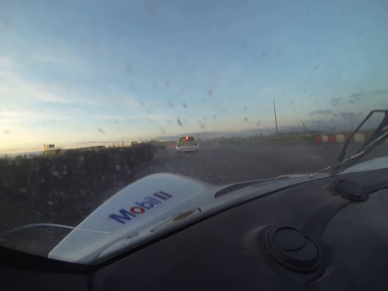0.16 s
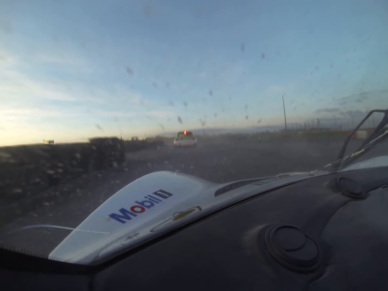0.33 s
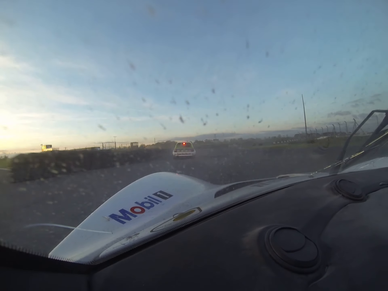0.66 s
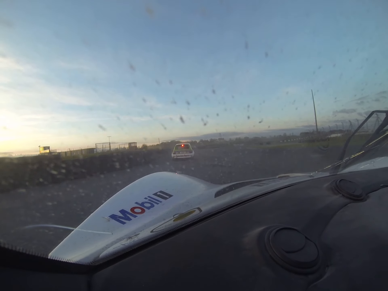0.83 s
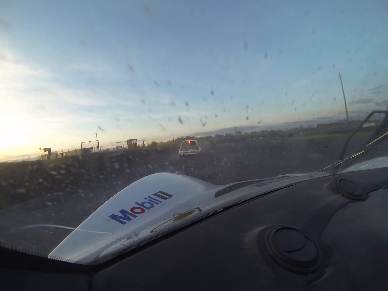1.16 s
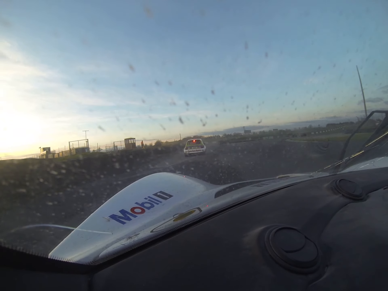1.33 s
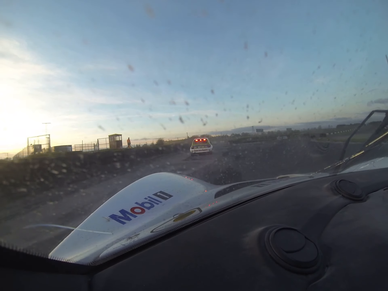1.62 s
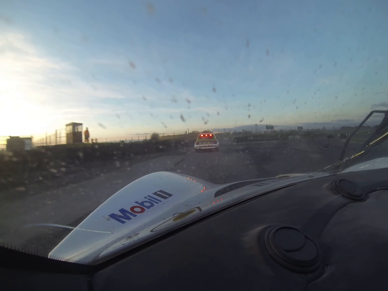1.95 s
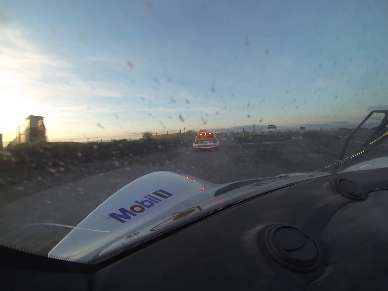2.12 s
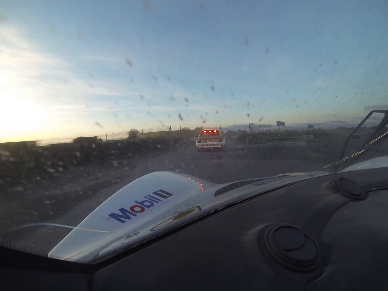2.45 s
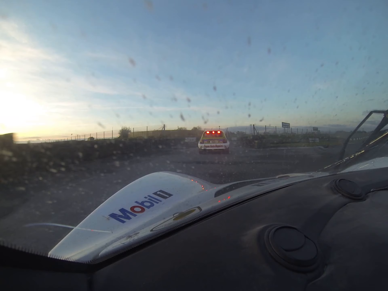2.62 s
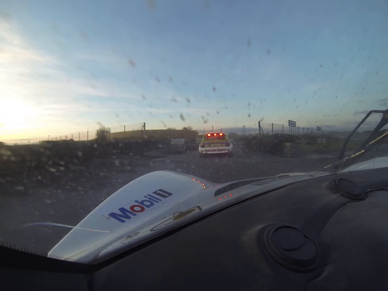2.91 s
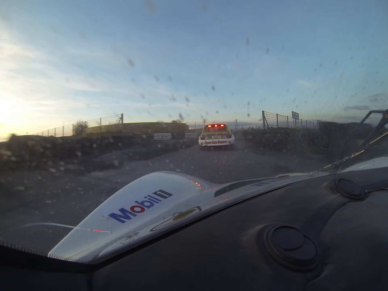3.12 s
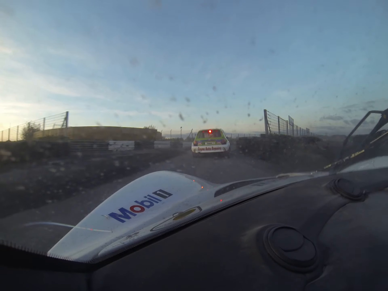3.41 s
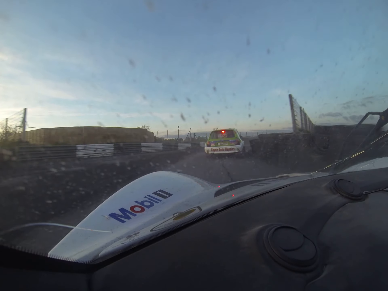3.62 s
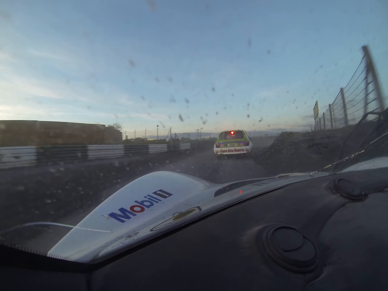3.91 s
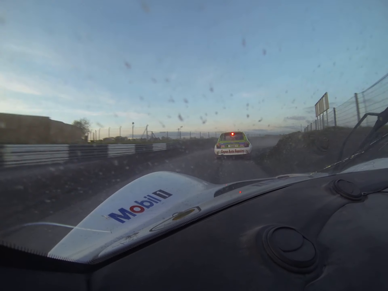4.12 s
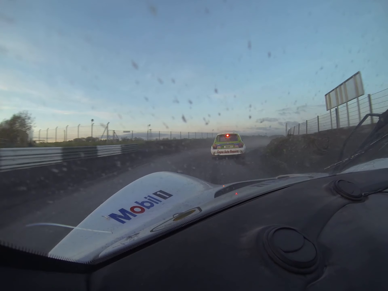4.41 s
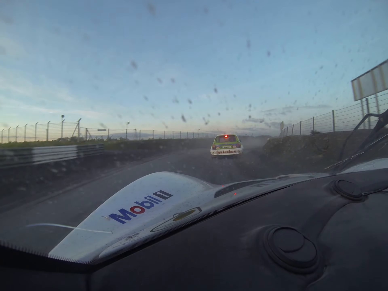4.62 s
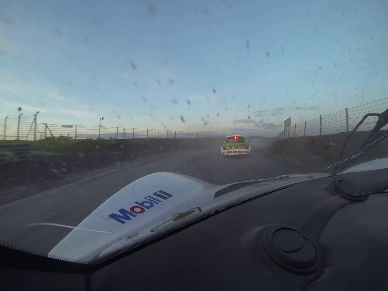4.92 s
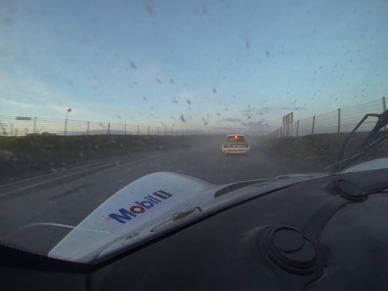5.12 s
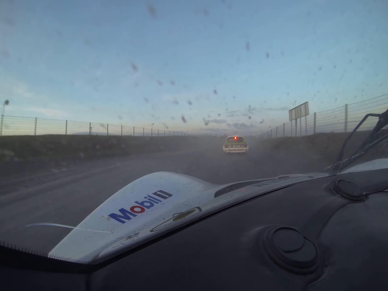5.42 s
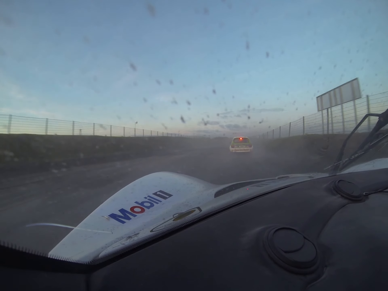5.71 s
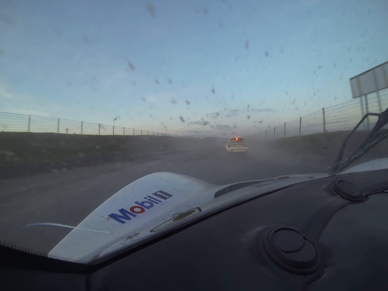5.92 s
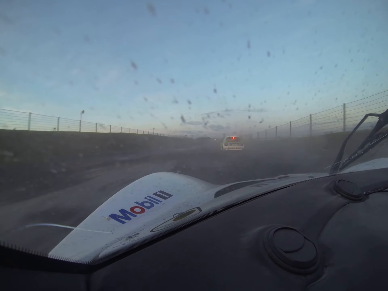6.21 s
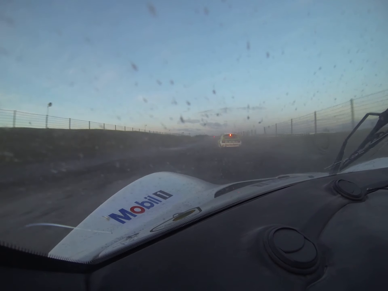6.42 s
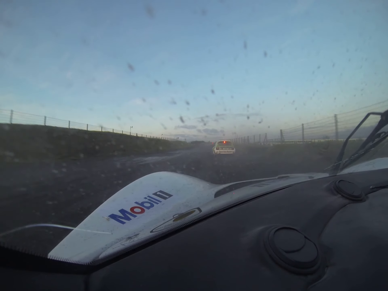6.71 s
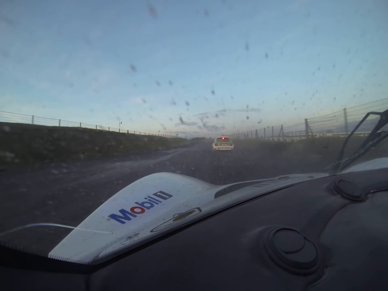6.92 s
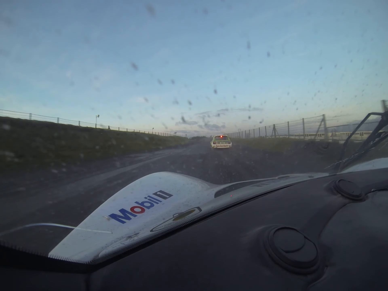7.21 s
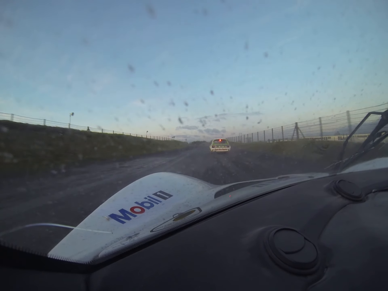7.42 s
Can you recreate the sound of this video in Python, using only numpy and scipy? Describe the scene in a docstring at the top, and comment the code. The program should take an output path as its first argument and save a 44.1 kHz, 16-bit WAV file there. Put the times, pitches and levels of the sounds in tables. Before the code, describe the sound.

A racing car's growling engine slows for a bend then pulls up, heard from the cabin with bangs, gravel spray and gear whine.

```python
"""Inside a rally car racing on a wet, muddy track. The bare body shell booms and shakes on the ruts,
the wheels fling grit against the arches and stones ring a metal guard. Sharp knocks and bangs, mostly
off the throttle, rattle the panels and thud through the floor. Over this the four-cylinder engine
sinks for a bend and pulls up again. Its firing makes the cabin drone, its exhaust growl and
mechanical rasp swell under load, and its gear teeth whine."""
import sys
import numpy as np
from scipy import signal
from scipy.fft import rfft, irfft
from scipy.io import wavfile
from scipy.ndimage import uniform_filter1d, minimum_filter1d

SR = 44100
rng = np.random.default_rng(int(sys.argv[2]) if len(sys.argv) > 2 else 0)


def int16_out(signal):
    """Quantize to a 16-bit WAV file."""
    q = np.round(np.clip(np.atleast_2d(signal).T, -1, 1) * 32767)
    wavfile.write(sys.argv[1], SR, q.astype(np.int16))


N = 333396
TIME = np.arange(N) / SR


def from_db(db):
    """Turn decibels into a number to multiply by."""
    return 10 ** (np.asarray(db) / 20)


def unit_power(x):
    """Scale a signal to an average power of 1."""
    return x / np.sqrt(np.mean(x ** 2) + 1e-20)


def steadied(x, seconds):
    """Hold the power near 1 over every stretch of this length."""
    return x / np.sqrt(uniform_filter1d(x ** 2, int(seconds * SR)) + 1e-9)


def in_time(rows):
    """Join (seconds, value) points with straight lines, giving a value for every sample."""
    seconds, values = np.transpose(rows)
    return np.interp(TIME, seconds, values)


def at_hz(rows, hz):
    """Read a curve of (Hz, dB) points at these frequencies."""
    points_hz, db = np.transpose(rows)
    return np.interp(np.log(hz), np.log(points_hz), db)


def drift(rate_hz):
    """Smooth random wandering, typically 1 in size; a higher rate wanders faster."""
    step = 40  # samples between points
    pole = np.exp(-2 * np.pi * rate_hz * step / SR)
    noise = rng.standard_normal(N // step + 2002)
    slow = signal.lfilter([1], [1, -2 * pole, pole * pole], noise)[2000:]
    return np.interp(np.arange(N) / step, np.arange(len(slow)), unit_power(slow))


def swell(middle_s, length_s):
    """A rounded rise and fall of height 1."""
    return np.maximum(1 - (2 * (TIME - middle_s) / length_s) ** 2, 0)


def burst(start_s, attack_s, decay_s):
    """A quick rise to height 1 that then dies away."""
    age = TIME[:SR // 4]
    shape = (1 - np.exp(-age / attack_s)) * np.exp(-age / decay_s)
    out, at = np.zeros(N + SR), int(start_s * SR)
    out[at:at + len(age)] = shape / shape.max()
    return out[:N]


def grains(per_s, spread_db):
    """Tiny impacts at random moments; more spread makes their sizes more uneven."""
    sizes = from_db(spread_db * np.minimum(rng.exponential(1, N), 4)) * rng.choice([-1, 1], N)
    return unit_power(sizes * (rng.random(N) < per_s / SR))


# Where the cabin's panels ring. Each row: pitch in Hz, width in Hz, boost in dB (minus is a dip).
PANELS = [(509, 8.3, 6), (657, 270, -6.5), (840, 6.1, 2), (1022, 139, 15.5), (1332, 78, 9.5),
          (1512, 110, 8.5), (1686, 76, 8.5), (1920, 150, 6), (2052, 74, 12.5), (2100, 86, -10),
          (2297, 66, 10), (2881, 180, 14.5), (3210, 51, 7.5), (3630, 44, 7), (4266, 130, 10.5),
          (4670, 100, 6.5), (5030, 55, 6.5), (5830, 80, 1.5), (6300, 79, 6.5), (7220, 110, 6.5),
          (7650, 83, 4.5)]

def panels_db(hz):
    """How much the ringing panels boost these frequencies."""
    return sum(db / (1 + (2 * (hz - centre) / width) ** 2) for centre, width, db in PANELS)


def coloured(x, colour, ringing=0):
    """Give a sound its tone colour, plus a share of the panels' ringing."""
    size = 32768
    hz = np.maximum(np.arange(size // 2 + 1) * SR / size, 1)
    gain = from_db(at_hz(colour, hz) + ringing * panels_db(hz))
    # Build the filter so that it rings after each hit, never before.
    cepstrum = irfft(np.log(unit_power(gain)))
    cepstrum[1:size // 2] *= 2
    cepstrum[size // 2 + 1:] = 0
    return signal.fftconvolve(x, irfft(np.exp(rfft(cepstrum))))[:N]


# Tone colours of the boom and the deeper shake. Each row: frequency in Hz, level in dB.
BOOM_COLOUR = [(25, -26.5), (55, -7.5), (85, -5.5), (125, -9), (180, 6), (230, 2), (290, -2), (340, -27.5),
               (450, -17.5), (700, -34), (2000, -76)]
SHAKE_COLOUR = [(12, -30), (21, 1.5), (28, 8), (38, -5), (55, -21.5), (100, -33.5), (300, -92.5)]
# How rough the track is. Each row: time in seconds, dB above the usual.
ROUGHNESS = [(0, 3.5), (0.45, 2.5), (0.7, -5.5), (1.0, -2), (2.3, 0), (3.38, 0), (3.68, -8), (3.88, -1.5),
             (4.33, 1), (4.43, -9), (4.9, 0), (5.75, 1), (6.12, -5.5), (6.48, -0.5), (6.72, -3), (7.56, 3)]
# Ruts and ripples. Each row: middle and length in seconds, then extra boom, shake and hum in dB.
RUTS = [(0.247, 1.14, -4, 6.5, 12.5), (1.168, 0.21, 2.5, 4.5, 0), (1.97, 0.55, 3, 5.5, -2),
        (2.413, 0.74, -1, 1, 17), (2.85, 0.15, 5, 8.5, 7), (3.085, 0.37, 1, 10.5, 8),
        (3.404, 0.28, 1, 0.5, 19), (4.09, 0.38, -0.5, 11, 11), (5.212, 0.2, 6, 8, -2),
        (5.407, 0.34, 1, 10, 1), (5.733, 0.27, 0, 6, -7), (6.52, 0.24, 4, 3, 10),
        (7.485, 0.14, -6.5, 10.5, 3.5)]

def body_shell(hum_hz=85):
    """The rough track makes the cabin's air boom and hum, and rocks the body harder in every rut."""
    rough_db = in_time(ROUGHNESS)
    boom_db, shake_db, hum_db = -21 + rough_db, -24 + 0.3 * rough_db, -39.5 + rough_db
    shake_db -= 9 * swell(middle_s=5.03, length_s=0.49)  # the body settles for a moment
    for middle, length, more_boom, more_shake, more_hum in RUTS:
        rut = swell(middle, length)
        boom_db += more_boom * rut
        shake_db += more_shake * rut
        hum_db += more_hum * rut
    boom = steadied(coloured(rng.standard_normal(N), BOOM_COLOUR), seconds=0.11)
    shake = steadied(coloured(rng.standard_normal(N), SHAKE_COLOUR), seconds=0.15)
    angle = 2 * np.pi * hum_hz * TIME
    hum = steadied(drift(42) * np.sin(angle) + drift(24) * np.cos(angle), seconds=1.0)
    return from_db(boom_db) * boom + from_db(shake_db) * shake + from_db(hum_db) * hum


# Wet patches. Each row: middle in seconds, length in seconds, extra gravel in dB.
WET_PATCHES = [(5.15, 0.61, 5), (7.5, 0.54, 2.5)]
# The biggest sprays of grit. Each row: start in seconds, level in dB, share of sand from 0 to 1.
SPRAYS = [(0.506, -38.5, 0.06), (1.246, -43, 0.2), (1.271, -40.5, 0.3), (1.338, -46, 0.9), (1.368, -50, 1),
          (1.393, -47, 0.9), (2.221, -40.5, 0.44), (2.436, -42.5, 0.5), (2.868, -41, 0.16),
          (3.169, -47, 0.5), (3.266, -43, 0.85), (3.33, -52, 0.2), (3.655, -46.5, 0), (3.742, -50.5, 0),
          (3.873, -50, 0.1), (4.069, -43, 0.24), (4.195, -40, 0.05), (4.275, -26, 0.17), (4.321, -42.5, 1),
          (5.188, -50, 0.9), (5.263, -38.5, 1), (5.361, -44, .9), (5.422, -36.5, 0.6), (5.574, -31, 0.23),
          (5.72, -37, 0.45), (6.21, -40.5, 0.35), (6.607, -45.5, 0), (7.082, -41, 0.73)]
# Tone colour of the grit. Each row: frequency in Hz, level in dB.
GRIT_COLOUR = [(500, -29), (1800, 7), (4200, 5), (5400, -6.5), (8000, -5.5), (11000, -10), (14500, -20)]

def grit(load_db, pull, clods_per_s=5, attack_s=0.0032, decay_s=0.012, spray_boost_db=6, mud_hz=6900):
    """Clods burst on the arches, sand sharp and mud dull, over gravel that grows as the wheels spin."""
    wet_db = sum(db * swell(middle, length) for middle, length, db in WET_PATCHES)
    gravel_level = from_db(-49.5 + 1.15 * load_db + 1.5 * pull + wet_db + 3.4 * drift(23))
    clod_hits = rng.random(N) < clods_per_s / SR
    clods = clod_hits * gravel_level * from_db(2 + rng.standard_normal(N))
    sand_level = signal.fftconvolve(clods, burst(0, attack_s, decay_s)[:SR // 4])[:N]
    mud_level = np.zeros(N)
    for start, db, sand_share in SPRAYS:
        shower = from_db(db + spray_boost_db) * burst(start, attack_s, decay_s)
        sand_level += sand_share * shower
        mud_level += (1 - sand_share) * shower
    patter = gravel_level * grains(per_s=13000, spread_db=0.5)
    mud = mud_level * grains(per_s=3000, spread_db=6.5)
    dull = signal.sosfilt(signal.butter(4, mud_hz, fs=SR, output="sos"), patter + mud)
    ticks = from_db(-17) * gravel_level * grains(per_s=41, spread_db=0.5)  # chips on the windscreen
    sand = sand_level * grains(per_s=3800, spread_db=0)
    return coloured(sand + dull + ticks, GRIT_COLOUR, ringing=0.83)


# Stones that hit a metal guard. Each row: start in seconds, level in dB.
STONES = [(2.828, -47.5), (2.919, -57), (3.659, -60), (3.873, -50), (4.16, -53), (4.279, -59)]
# The guard's ringing tones. Each row: pitch in Hz, level in dB, seconds to fade by 60 dB.
GUARD_TONES = [(3240, 4, 0.23), (3840, -14.5, .14), (4390, 5.5, 0.19), (4900, 2.5, 0.18),
               (5960, -16, 0.057), (7550, -40, 0.059)]

def stones(spread_db=3.1):
    """Each stone rings all the guard's tones, in a slightly different mix every time."""
    out, age = np.zeros(N), TIME[:SR // 3]
    for start, db in STONES:
        at = int(start * SR)
        for hz, tone_db, fade_s in GUARD_TONES:
            strength = from_db(db + tone_db + rng.normal(0, spread_db))
            fade = from_db(-60 * age / fade_s)
            out[at:at + len(age)] += strength * fade * np.sin(2 * np.pi * hz * age)
    return out


# Sharp knocks and bangs, mostly off the throttle.
# Each row: start in seconds, rattle in dB, thud in dB, rattle decay in seconds.
KNOCKS = [(.198, -22, -12.5, 0.0025), (0.262, -24.5, -31, 0.018), (0.421, -17, -11.5, 0.0056),
          (0.499, -12.5, -24, 0.014), (0.544, -26, -21.5, 0.025), (2.002, -19.5, -15, 0.0046),
          (2.409, -24, -30, .003), (2.441, -23, -35, 0.0032), (2.815, -20.5, -30.5, 0.029),
          (2.922, -22, -24, 0.0066), (3.289, -26.5, -9.5, 0.018), (3.31, -19, -13, 0.022),
          (3.354, -16, -12, 0.0046), (3.423, -26, -15.5, 0.027), (3.842, -22.5, -14.5, 0.016),
          (3.959, -25, -13.5, 0.024), (4.114, -19.5, -17, 0.0074), (4.166, -14, -7.5, 0.0025),
          (4.283, -18, -13.5, 0.021), (4.324, -9, -8.5, 0.0031), (4.372, -24, -34, 0.0015),
          (5.268, -15.5, -25, 0.0073), (6.575, -31, -8.5, 0.014), (6.608, -21.5, -26, 0.0077)]
# Tone colour of the rattle. Each row: frequency in Hz, level in dB.
RATTLE_COLOUR = [(100, -17), (520, 2), (750, -3.5), (1100, -2), (1600, 7.5), (2000, 0.5), (2300, -15),
                 (4500, -25.5), (5500, -37), (14000, -69.5)]

def knocks_and_bangs(thud_hz=185, overtone_hz=300, thud_decay_s=0.014, bump_hz=72, bump_decay_s=0.029):
    """Each one rattles the panels for an instant, thuds through the floor and bumps the whole shell."""
    rattle_level, blows = np.zeros(N), np.zeros(N)
    for start, rattle_db, thud_db, decay in KNOCKS:
        rattle_level += from_db(rattle_db) * burst(start, attack_s=0.0044, decay_s=decay)
        blows[int(start * SR)] = from_db(thud_db + 5.5)
    age = TIME[:SR // 5]
    overtone = from_db(-11) * np.sin(2 * np.pi * overtone_hz * age)
    thud = (np.sin(2 * np.pi * thud_hz * age) - overtone) * np.exp(-age / thud_decay_s)
    bump = from_db(-12.5) * np.sin(2 * np.pi * bump_hz * age) * np.exp(-age / bump_decay_s)
    rattle = steadied(coloured(rng.standard_normal(N), RATTLE_COLOUR, ringing=0.39), seconds=0.0077)
    return rattle_level * rattle + signal.fftconvolve(blows, thud + bump)[:N]


# How loud the gears whine. Each row: time in seconds, level in dB.
WHINE = [(0, -42), (1.7, -42), (4.5, -57.5), (5.0, -37), (5.5, -33.5), (5.66, -17), (5.86, -35.5),
         (6.35, -34), (7.56, -65.5)]

def gear_whine(firings, teeth_per_firing=9.4, waver=0.18):
    """Meshing teeth sing a wavering tone in step with the engine."""
    backlash = 0.3 * drift(25)  # slack between the teeth
    tone = np.sin(2 * np.pi * teeth_per_firing * firings + backlash) * (1 + waver * drift(40))
    return from_db(in_time(WHINE)) * unit_power(tone)


# Brief lifts off the throttle. Each row: start and length in seconds, dip of the drone in dB,
# dip of the engine's higher sounds in dB (minus is a boost).
LIFTS = [(0, 0.42, 8.5, 0.5), (0.303, 0.078, 27, 9), (0.369, 0.38, 13, 3.5), (0.708, 0.35, 7.5, 1.5),
         (2.543, 0.085, 8.5, 1.5), (2.695, 0.22, 4, 6), (3.08, 0.16, 13, -2), (6.605, 0.16, 8.5, 7.5),
         (6.815, 0.071, 4, 5)]

def throttle_lifts():
    """Level changes in dB: each lift sets in quickly, holds, and lets go a little more slowly."""
    drone_db, upper_db = 0, 0
    for start, length, drone_dip, upper_dip in LIFTS:
        lifted = np.interp(TIME, start + length * np.array([0, 0.2, 0.7, 1]), [0, 1, 1, 0])
        drone_db -= drone_dip * lifted
        upper_db -= upper_dip * lifted
    return drone_db, upper_db


# Tone colour of the rasp. Each row: frequency in Hz, level in dB.
RASP_COLOUR = [(100, -16), (350, 3), (480, -2.5), (680, -1.5), (920, -2.5), (1200, -7.5), (1600, 2.5),
               (1980, -4), (2150, -13), (3000, -23), (3700, -26.5), (4600, -25.5), (5300, -41),
               (10000, -50)]

def engine_rasp(firings, load_db, lift_db, repeat=0.61, pulsing=0.57):
    """Valves and gears clatter: part repeats every cycle of four firings, part is always new."""
    size = 1024
    cycle_noise = np.interp(firings / 4 % 1 * size, np.arange(size), rng.standard_normal(size))
    pulses = 1 + pulsing * np.cos(2 * np.pi * firings)
    clatter = (repeat * cycle_noise + rng.standard_normal(N)) * pulses * from_db(0.47 * drift(58))
    rasp = steadied(coloured(clatter, RASP_COLOUR, ringing=0.96), seconds=0.95)
    return from_db(-26.5 + load_db + lift_db) * rasp


# The tones of the growl. Each row: vibrations per cycle of four firings, level in dB.
GROWL_TONES = [(5, 4), (6, -18), (7, -21.5), (9, -14.5), (10, -14), (11, -20), (12, -4.5), (16, -6.5),
               (19, -7), (20, -7), (22, -15), (24, -10), (28, -10), (32, -14.5), (36, -19), (40, -19.5)]
# The exhaust pipe's snarl and the hollow below it. Each row: frequency in Hz, boost in dB.
PIPE = [(550, 0.5), (680, -6), (790, -1), (835, 7), (930, 7.5), (990, -3), (1150, 2.5), (1400, -2)]

def exhaust_growl(firing_hz, firings, load_db, pull, lift_db, roughness=0.67):
    """Rough tones follow the engine's speed and swell where the pipe and the panels ring."""
    angle = 2 * np.pi * firings + 0.07 * drift(28)  # slightly uneven firing
    grid_hz = np.arange(SR // 8)
    boost_db = panels_db(grid_hz)
    panel_gain = from_db((boost_db - boost_db.max() / 2) / 2)
    growl = 0
    for per_cycle, db in GROWL_TONES:
        per_firing = per_cycle / 4
        hz = per_firing * firing_hz
        phase = per_firing * angle + 0.28 * drift(35) + rng.uniform(0, 2 * np.pi)
        gain = from_db(db + at_hz(PIPE, hz)) * np.interp(hz, grid_hz, panel_gain)
        growl += gain * (1 + roughness * np.tanh(drift(17))) * np.sin(phase)
    speed_db = 7 * np.log2(firing_hz / 190)  # 7 dB louder at twice the speed
    return np.sqrt(2) * from_db(-37 + load_db + 3.5 * pull + speed_db + lift_db) * growl


# Ragged firing off the throttle. Each row: time in seconds, how far the wave strays in radians.
BURBLE = [(0, .2), (.55, .3), (.7, .07), (2.7, .07), (3.15, .5), (3.35, 1.3), (4.35, 1.3), (4.6, .1),
          (7.56, .07)]
# How the cabin booms at the firing rate and an octave up. Each row: frequency in Hz, level in dB.
DRONE_RESPONSE = [(135, -29.5), (152, -31), (161, -24), (164, -26.5), (169, -17.5), (174, -11), (181, -11),
                  (192, -13), (203, -12.5), (211, -21.5), (221, -21.5), (232, -12.5)]
OCTAVE_RESPONSE = [(270, -30.5), (286, -39), (297, -28.5), (322, -37.5), (340, -26), (362, -33.5),
                   (384, -42), (425, -39.5), (465, -39)]

def engine_drone(firing_hz, firings, pull, drone_lift_db, octave_lift_db, flutter=0.097):
    """The firing makes two strong tones, an octave apart, that slide through the cabin's booms."""
    angle = 2 * np.pi * firings + in_time(BURBLE) * drift(19)
    drone_db = at_hz(DRONE_RESPONSE, firing_hz) + 0.46 * pull + drone_lift_db
    drone = from_db(drone_db) * (1 + flutter * drift(35)) * np.sin(angle)
    octave_db = at_hz(OCTAVE_RESPONSE, 2 * firing_hz) + 7.5 * pull + octave_lift_db + 2 * drift(12)
    octave = from_db(octave_db) * np.sin(2 * angle)
    return np.sqrt(2) * (drone + octave)


def pull_of(firing_hz, hard_hz_per_s=29, smooth_s=0.9):
    """How hard the engine is gaining speed (up to 1) or losing it (down to -1)."""
    hz_per_s = uniform_filter1d(np.gradient(firing_hz) * SR, int(smooth_s * SR), mode="constant")
    return np.tanh(hz_per_s / hard_hz_per_s)


# Engine speed. Each row: time in seconds, firings per second.
ENGINE_SPEED = [(0, 185), (0.36, 195), (0.52, 190), (0.8, 194), (0.94, 189.5), (1.16, 204), (1.3, 201),
                (1.8, 212), (1.92, 201), (2.14, 200), (2.86, 167), (3.18, 166), (3.52, 147.5), (3.95, 135),
                (4.84, 148.5), (5.24, 162), (5.52, 164), (6.4, 187), (6.56, 200), (6.72, 195), (6.97, 228),
                (7.14, 218), (7.35, 233), (7.56, 219.5)]
# How hard the engine works. Each row: time in seconds, dB above a steady pull.
ENGINE_LOAD = [(0, -3), (0.38, -1), (0.64, -7), (0.85, -2.5), (1.78, 4), (2.15, -3.5), (2.92, -1),
               (3.26, -5.5), (3.52, -12), (4.17, -2), (4.38, -11), (4.66, -7.5), (5.28, 4.5), (6.0, 0.5),
               (6.8, -0.5), (7.56, 3.9)]

def scene():
    """The engine and the track together, as heard at the dashboard."""
    firing_hz, load_db = in_time(ENGINE_SPEED), in_time(ENGINE_LOAD)
    firings = np.cumsum(firing_hz) / SR  # how many times the engine has fired so far
    pull = pull_of(firing_hz)
    drone_lift_db, upper_lift_db = throttle_lifts()
    engine = engine_drone(firing_hz, firings, pull, drone_lift_db, upper_lift_db)
    engine += exhaust_growl(firing_hz, firings, load_db, pull, upper_lift_db)
    engine += engine_rasp(firings, load_db, upper_lift_db)
    engine += gear_whine(firings)
    return (engine + body_shell() + knocks_and_bangs() + stones() + grit(load_db, pull))[None]


def record(dry, window_samples=129, top_hz=16000):
    """A fast limiter turns the hardest peaks down to full scale, then the highest treble is cut."""
    needed_gain = 1 / np.maximum(np.abs(dry), 1)
    gain = uniform_filter1d(minimum_filter1d(needed_gain, window_samples), window_samples)
    return signal.sosfilt(signal.cheby2(12, 60, top_hz, fs=SR, output="sos"), gain * dry)


dry = scene()
out = record(dry)
int16_out(out)
```